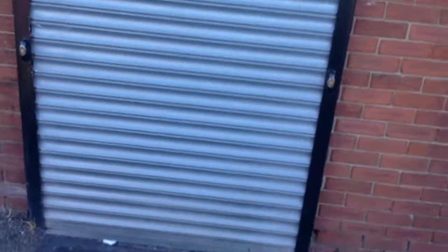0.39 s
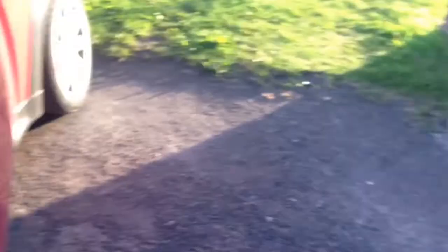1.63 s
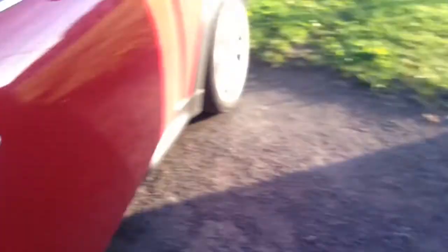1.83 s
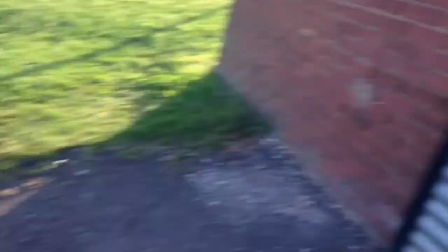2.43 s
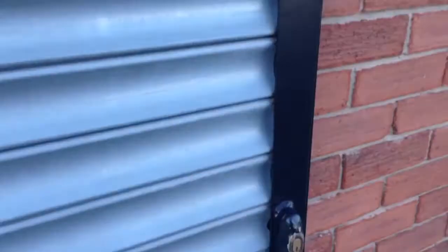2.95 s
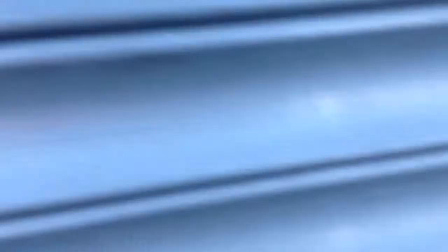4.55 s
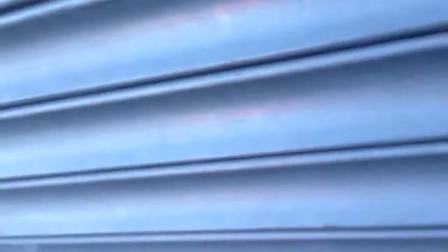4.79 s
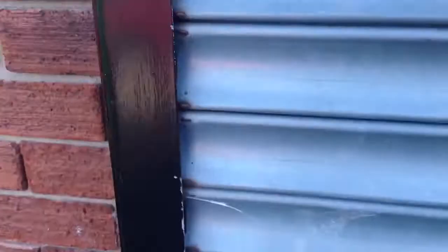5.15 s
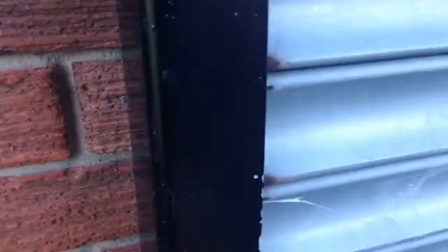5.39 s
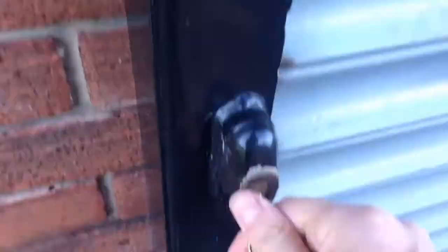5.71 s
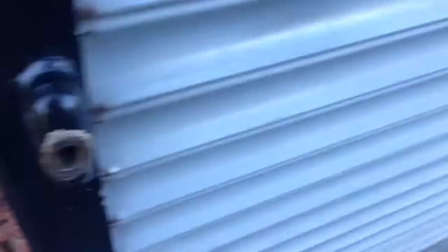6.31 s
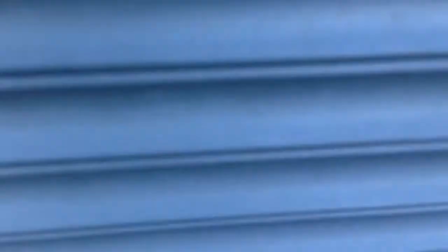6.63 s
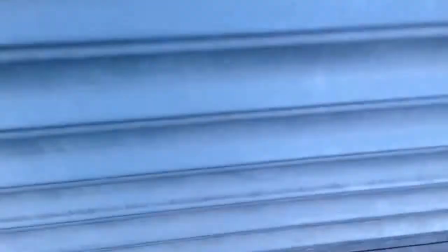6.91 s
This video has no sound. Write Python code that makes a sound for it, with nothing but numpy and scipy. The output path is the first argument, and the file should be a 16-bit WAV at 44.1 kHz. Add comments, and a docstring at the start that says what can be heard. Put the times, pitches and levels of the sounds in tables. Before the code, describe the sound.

Footsteps scuff, keys jingle and click in a lock as a vehicle passes, then a metal roller shutter clanks and starts rattling.

```python
"""Outside a brick building, shoes scuff over grit to a steel roller shutter and the microphone is bumped.
A bunch of keys jingles, each key ringing at its own pitches, and one cracks round in the key switch,
while a vehicle accelerates down the street with tyre hiss and a climbing exhaust note.
The shutter clanks as its drive takes up the slack, and the slats start to rattle upward."""
import sys
import numpy as np
from scipy import signal
from scipy.fft import rfft, irfft
from scipy.io import wavfile
from scipy.ndimage import map_coordinates

SR = 44100
rng = np.random.default_rng(int(sys.argv[2]) if len(sys.argv) > 2 else 0)


def dump(signal):
    """Clip the signal to [-1, 1] and save it as 16-bit WAV at the path in sys.argv[1]."""
    limited = np.clip(np.atleast_2d(signal).T, -1, 1)
    pcm = np.round(limited * 32767).astype(np.int16)
    wavfile.write(sys.argv[1], SR, pcm)


N = 311787
TIME = np.arange(N) / SR
BAND_EDGES_HZ = np.geomspace(22, 17000, 25)
BAND_HZ, BAND_WIDTH_HZ = np.sqrt(BAND_EDGES_HZ[1:] * BAND_EDGES_HZ[:-1]), np.diff(BAND_EDGES_HZ)
KEY_RANGE_HZ, CUTOFF_HZ = (6940, 14300), 15750

# bright tone of a key striking metal: freq_hz, level_db
KEY_EQ = [(600, -9), (1500, -4.5), (4200, -2.5), (7700, 1), (10000, -1), (16000, -0.5)]
# how hard the bunch swings, as the level of its tinkling: time_s, level_db
KEY_SWING = [(2.6, -69), (2.95, -56), (3.15, -66), (3.55, -53.5), (3.85, -56.5), (4.05, -48.5), (4.55, -47),
             (4.75, -55), (5.3, -53.5), (5.9, -68), (6.3, -44.5), (6.7, -56.5)]


def from_db(db):
    """Decibels to gain."""
    return 10 ** (np.asarray(db) / 20)


def unit_rms(x):
    """Scale to rms 1."""
    return x / np.sqrt(np.mean(x ** 2) + 1e-20)


def fader(points):
    """Gain from (time_s, level_db) points, silent outside their span."""
    times, db = np.transpose(points)
    return from_db(np.interp(TIME, times, db)) * (TIME > times[0]) * (TIME < times[-1])


def ramp(start_s, length_s):
    """Linear fade from 0 to 1."""
    return np.clip((TIME - start_s) / length_s, 0, 1)


def swell(peak_s, level_db, rise_s, fall_s):
    """Gain of a rounded swell, 29 dB down at rise_s before its peak and fall_s after."""
    gain = np.zeros(N)
    span = slice(*np.searchsorted(TIME, [peak_s - 3 * rise_s, peak_s + 3 * fall_s]))
    away = np.maximum((peak_s - TIME[span]) / rise_s, (TIME[span] - peak_s) / fall_s).clip(0)
    gain[span] = from_db(level_db - 29 * away ** 2.27)
    return gain


def drift(rate_hz):
    """Smooth random wander of rms about 1."""
    hop, warm_up = 40, 2000
    pole = np.exp(-2 * np.pi * hop * rate_hz / SR)
    white = rng.standard_normal(N // hop + warm_up + 2)
    slow = signal.lfilter([1], [1, -2 * pole, pole ** 2], white)[warm_up:]
    return np.interp(np.arange(N) / hop, np.arange(len(slow)), unit_rms(slow))


def eq_db(eq, hz):
    """Read an EQ curve on a log-frequency axis."""
    freqs, db = np.transpose(eq)
    return np.interp(np.log(hz), np.log(freqs), db)


def equalise(x, eq):
    """Minimum-phase EQ, falling 24 dB per octave past the curve's ends; rms 1."""
    size = 4096
    hz = np.arange(size // 2 + 1).clip(.5) * SR / size
    octaves_outside = np.maximum(np.log2(eq[0][0] / hz), np.log2(hz / eq[-1][0])).clip(0)
    cepstrum = irfft(np.log(from_db(eq_db(eq, hz) - 24 * octaves_outside)))
    cepstrum[1:size // 2] *= 2
    cepstrum[size // 2 + 1:] = 0
    impulse = irfft(np.exp(rfft(cepstrum)))
    return unit_rms(signal.fftconvolve(x, impulse)[:N])


def noise_bed(eq, flutter_db, rate_hz):
    """Shaped noise whose level wavers."""
    return equalise(rng.standard_normal(N), eq) * from_db(flutter_db * drift(rate_hz))


def noise_bands():
    """Narrow noise bands of rms 1; neighbours come from unrelated noise."""
    white = rng.standard_normal((2, N))
    bands = []
    for k in range(len(BAND_HZ)):
        bandpass = signal.butter(2, BAND_EDGES_HZ[k:k + 2], "band", fs=SR, output="sos")
        bands.append(unit_rms(signal.sosfilt(bandpass, white[k % 2])))
    return np.array(bands)


def grains(per_s, spread_db):
    """Tiny random contacts of uneven size."""
    sizes = from_db(spread_db * rng.exponential(1, N).clip(0, 3)) * rng.choice([-1, 1], N)
    return unit_rms(sizes * (rng.random(N) < per_s / SR)) + 1e-18


def pings(rows, t60_s):
    """Damped sines from rows of (start_s, level_db, pitch_hz)."""
    out, age = np.zeros(N + SR), np.arange(int(t60_s * SR)) / SR
    for start_s, db, hz in rows:
        at = int(start_s * SR)
        out[at:at + len(age)] += from_db(db - 60 * age / t60_s) * np.sin(2 * np.pi * hz * age)
    return out[:N]


def resonate(contacts, modes):
    """Each contact drives every mode with a strength of its own; rms 1."""
    out = 0
    for hz, width_hz, db in modes:
        r = np.exp(-np.pi * width_hz / SR)
        poles = [1, -2 * r * np.cos(2 * np.pi * hz / SR), r * r]
        drive = contacts * rng.standard_normal(N)
        out = out + from_db(db) * signal.lfilter([1 - r, 0, r - 1], poles, drive)
    return unit_rms(out)


def impacts(bands, hits, eq, t60_s, bass_hold, scatter_db, rattle_db,
            modes=(), modes_db=0, attack_s=0.00094):
    """Rattling noise bursts plus clear modes; t60_s holds at 2 kHz, and bass_hold lengthens the lows.
    A hit is start_s, level_db, then optionally tilt_db_per_octave, its own t60_s, ring_db."""
    out, t = np.zeros(N + SR), np.arange(SR // 2) / SR
    rattle = from_db(rattle_db * drift(104))   # tiny rebounds roughen the decay
    octaves = np.log2(BAND_HZ.clip(400) / 1000)
    defaults = [0, t60_s, 0]
    for start_s, db, *given in hits:
        tilt, decay_s, ring_db = given + defaults[len(given):]
        # every point of contact favours other bands
        band_db = eq_db(eq, BAND_HZ) + tilt * octaves + scatter_db * rng.standard_normal(len(BAND_HZ))
        gains = from_db(band_db) * np.sqrt(BAND_WIDTH_HZ)
        offset, size = rng.integers(N - SR), min(int(2 * decay_s * SR), len(t))
        burst = bands[:, offset:offset + size] * (gains / np.linalg.norm(gains))[:, None]
        band_t60_s = decay_s * (BAND_HZ[:, None] / 2000) ** -bass_hold
        envelope = from_db(-60 * t[:size] / band_t60_s) * (1 - np.exp(-t[:size] / attack_s))
        rough = rattle[offset:offset + size]
        rough = rough / np.sqrt(np.mean(rough[:size // 10] ** 2))
        at = int(start_s * SR)
        out[at:at + size] += from_db(db) * (burst * envelope).sum(0) * rough
        for hz, width_hz, mode_db in modes:
            age = t[:int(np.pi * SR / width_hz)]
            strength = from_db(db + modes_db + ring_db + mode_db + 2 * rng.standard_normal())
            strength *= rng.choice([-1, 1])
            pitch_hz = hz + width_hz / 2 * rng.standard_normal()
            ring = np.sin(2 * np.pi * pitch_hz * age) * np.exp(-np.pi * width_hz * age)
            out[at:at + len(age)] += strength * ring
    return out[:N]


def pass_by(closest_s, distance_m=8.05, speed_m_per_s=10.8):
    """Inverse-distance gain of the passing vehicle, 1 at its closest."""
    return distance_m / np.hypot(distance_m, speed_m_per_s * (TIME - closest_s))


def street():
    """Air rumble, far traffic and passing tyres; boomy and dull until just after the microphone bump."""
    # low rumble of outdoor air: freq_hz, level_db
    rumble_eq = [(25, -16), (65, -7), (175, 2), (300, -11.5), (500, -27.5)]
    # road roar: freq_hz, level_db
    roar_eq = [(90, -27.5), (220, -2), (380, 2), (700, -2.5), (1300, -10), (2400, -19.5)]
    # tyre hiss: freq_hz, level_db
    hiss_eq = [(1500, 1), (2800, 5), (4500, -2), (6500, 2.5), (8000, -8.5), (11000, -8), (16000, -14)]
    opens_s = 2.355
    dull = 1 - ramp(opens_s, 0.11)
    boom = from_db(-49) * (1 - ramp(opens_s, 0.0084))
    rumble_gain = boom + from_db(-66.5) * ramp(opens_s, 0.54)
    rumble = noise_bed(rumble_eq, flutter_db=3, rate_hz=10.4) * rumble_gain
    # steady far traffic plus the vehicle, whose tyres hiss most as it draws away
    road, tyres = pass_by(closest_s=4.92), pass_by(closest_s=5.72)
    roar_gain = np.hypot(from_db(-51), from_db(-41) * road) * from_db(-4 * dull)
    hiss_gain = np.hypot(from_db(-58.5), from_db(-51.5) * tyres) * from_db(-7 * dull)
    roar = noise_bed(roar_eq, flutter_db=2, rate_hz=29.5) * roar_gain
    hiss = noise_bed(hiss_eq, flutter_db=1.77, rate_hz=47) * hiss_gain
    lag_ms = 0.243 * (1 - tyres) + 0.21 * tyres
    ground_bounce = 0.6 * np.interp(TIME - lag_ms / 1000, TIME, hiss)
    return rumble + roar + hiss + ground_bounce


def exhaust(jitter=0.007, roughness=0.45):
    """The exhaust note climbs as the vehicle pulls away; uneven firing roughens it."""
    # the engine's firing rate: time_s, pitch_hz
    firing = [(4.85, 223), (5.02, 231.7), (5.27, 248.8), (5.7, 308.4), (6.0, 337.8)]
    # the note surges twice, then sinks into the road noise: time_s, level_db
    surges = [(4.82, -43), (4.92, -47), (5.01, -31.5), (5.11, -41), (5.28, -33), (5.7, -42.5), (6.0, -53)]
    pitch_hz = np.interp(TIME, *np.transpose(firing)) * (1 + jitter * drift(21.5))
    phase = 2 * np.pi * np.cumsum(pitch_hz) / SR
    overtone = swell(5.5, -41, rise_s=0.15, fall_s=1) * np.sin(2 * phase)
    return (fader(surges) * np.sin(phase) + overtone) * (1 + roughness * drift(60))


def footsteps(bands):
    """Shoes tap, crunch and drag on gritty paving."""
    # footfalls: start_s, level_db, tilt_db_per_octave
    steps = [(0.071, -36, 11), (0.188, -40.5, 10.5), (0.441, -30, 5), (0.52, -37.5, 9), (0.624, -33.5, 0.5),
             (1.407, -32.5, 4), (1.615, -29, 11), (1.696, -20, 4.5), (1.752, -28, 5.5), (1.883, -32.5, 2)]
    # a sole tapping the paving: freq_hz, level_db
    step_eq = [(88, -19), (150, 9), (361, 7.5), (745, 2), (923, -12.5), (1800, -9), (2500, -6),
               (4320, -31.5), (5050, -26), (7320, -49), (16000, -60)]
    # soles dragging: peak_s, level_db, rise_s, fall_s
    scuffs = [(0.56, -50.5, 0.13, 0.22), (0.864, -33, 0.086, 0.051), (0.985, -31, 0.13, 0.11),
              (1.34, -37.5, 0.13, 0.081), (1.66, -44.5, 0.15, 0.31)]
    # grit underfoot: freq_hz, level_db
    grit_eq = [(300, -8), (750, 1.5), (1600, 1.5), (2200, -2), (3500, -15), (16000, -33)]
    taps = impacts(bands, steps, step_eq, t60_s=0.063, bass_hold=0.068, scatter_db=1, rattle_db=8,
                   attack_s=0.00063)
    grit = equalise(grains(per_s=2000, spread_db=3), grit_eq)
    crunch = sum(swell(s + 0.003, db - 15, rise_s=0.013, fall_s=0.021) for s, db, _ in steps)
    drag = from_db(-6) * sum(swell(*scuff) for scuff in scuffs)
    return from_db(-4) * taps + grit * (crunch + drag)


def microphone_bump(bands):
    """A knock sets the microphone's case ringing."""
    # the knock and its uneven rebounds: start_s, level_db, tilt_db_per_octave
    knocks = [(2.155, -7, 1), (2.172, -9, 1.5), (2.194, -12.5, 0.5), (2.247, -24, -1.5),
              (2.297, -31.5, -4.5)]
    # bass-heavy body of the knock: freq_hz, level_db
    knock_eq = [(30, -9), (70, 4), (105, 4.5), (200, -1.5), (350, -2), (550, -4.5), (800, -10), (1200, -11),
                (2000, -15.5), (4000, -22), (9000, -33), (16000, -49)]
    # case resonances: pitch_hz, width_hz, level_db
    case_modes = [(72, 16, -1), (103, 22, 8), (186, 11.6, 9), (244, 14, -3), (322.5, 9.8, 7), (380, 7.1, 0),
                  (432, 14, 0)]
    return impacts(bands, knocks, knock_eq, t60_s=0.13, bass_hold=0.29, scatter_db=0.5, rattle_db=2.5,
                   modes=case_modes, modes_db=-18.5, attack_s=0.00056)


def handling_thuds(bands):
    """Handling gives the microphone soft, low thuds."""
    # thuds: start_s, level_db
    thuds = [(0.462, -13.5), (0.882, -16), (1.793, -12), (2.777, -11), (4.394, -25), (4.444, -23),
             (6.319, -20)]
    # their muffled tone: freq_hz, level_db
    thud_eq = [(25, -10), (70, 1), (150, -3.5), (300, -21), (800, -27), (3000, -57)]
    return from_db(-13.5) * impacts(bands, thuds, thud_eq, t60_s=0.054, bass_hold=0.023,
                                    scatter_db=2, rattle_db=0.5)


def dry_ticks(bands):
    """Small dry clicks, each with a very short ring."""
    # ticks: start_s, level_db, tilt_db_per_octave, ring_hz, ring_db
    ticks = [(0.442, -34.5, 8.5, 2430, -26), (0.926, -26, -6, 830, -21), (1.003, -33, -5, 1400, -21),
             (1.014, -27, -7, 1230, -17.5), (1.028, -29, -10, 940, -19), (1.752, -34, 3, 3300, -30),
             (2.614, -33, 1.5, 750, -42), (3.064, -38, 9, 4000, -32.5), (4.584, -25, 5, 1110, -23),
             (4.786, -20.5, 2.5, 2960, -23.5), (4.874, -26.5, -4.5, 3000, -17),
             (4.896, -36, 16, 2680, -27.5), (5.24, -17, 2.5, 3050, -19.5), (6.507, -14.5, 10, 3400, -15.5),
             (6.56, -19, -1, 1710, -11.5), (6.693, -20, -7, 950, -27)]
    # their midrange click: freq_hz, level_db
    tick_eq = [(60, -44), (250, -3), (500, 0), (1100, 4.5), (1900, -8), (3000, -2), (5000, -19),
               (9000, -20), (16000, -59)]
    clicks = impacts(bands, [tick[:3] for tick in ticks], tick_eq, t60_s=0.017, bass_hold=0.23,
                     scatter_db=3, rattle_db=3)
    return clicks + pings([(s, ring_db, hz) for s, _, _, hz, ring_db in ticks], t60_s=0.0068)


def rubbing():
    """The microphone's case is rubbed in small slips."""
    # rubs: peak_s, level_db, rise_s, fall_s
    rubs = [(4.655, -35, 0.17, 0.13), (6.575, -24.5, 0.12, 0.095)]
    # close, dull friction: freq_hz, level_db
    rub_eq = [(180, -9.5), (330, 2), (520, 1), (780, 2.5), (1100, -1), (1450, -6), (2400, -13.5),
              (3600, -23), (9000, -34.5)]
    return equalise(grains(per_s=900, spread_db=2.2), rub_eq) * sum(swell(*rub) for rub in rubs)


def rustle():
    """A dry rustle of fine grains while the key is held."""
    # thin, peaky treble: freq_hz, level_db
    rustle_eq = [(1400, -8), (3200, -8), (4600, 11), (5600, -8), (7000, 1.5), (9500, -26), (15000, -25)]
    texture = equalise(grains(per_s=6100, spread_db=4), rustle_eq)
    return texture * swell(5.7, -52, rise_s=0.95, fall_s=0.7)


def swish(peak_s=5.27, octaves_per_s=1.1):
    """A short scrape whose resonances slide upward."""
    # the scrape's tone at its loudest: freq_hz, level_db
    swish_eq = [(2000, -1.5), (3500, -6), (4700, 6), (6000, -7), (7400, -5.5), (8400, -9), (9700, -16),
                (14000, -20)]
    scrape = equalise(grains(per_s=4500, spread_db=6.5), swish_eq)
    speed = 2 ** (octaves_per_s * (TIME - peak_s).clip(-.5, .5))
    sweep = map_coordinates(scrape, [np.cumsum(speed)], order=3, mode="wrap")
    return sweep * swell(peak_s, -44, rise_s=0.3, fall_s=0.19)


def key_touches(count):
    """Light random touches that follow the swing of the bunch, as (start_s, level_db, pitch_hz)."""
    times, swing_db = np.transpose(KEY_SWING)
    starts = times[0] + (times[-1] - times[0]) * (np.arange(count) + rng.random(count)) / count
    levels = np.interp(starts, times, swing_db) + rng.uniform(-3.45, 6, count)
    return list(zip(starts, levels, rng.uniform(*KEY_RANGE_HZ, count)))


def key_sizzle(count, spread_db=4):
    """Metal sliding on metal: a spray of tiny contacts, each ringing at its own pitch; rms 1."""
    hz = rng.uniform(1500, CUTOFF_HZ, count)
    db = eq_db(KEY_EQ, hz) + spread_db * rng.standard_normal(count)
    return unit_rms(pings(zip(rng.uniform(0, N / SR, count), db, hz), t60_s=0.005))


def keys(bands):
    """Keys clash, tinkle and scrape along each other as the bunch swings."""
    # key striking key: start_s, clash_db, ring_hz, ring_db
    jingles = [(2.7374, -26, 7370, -30), (2.7592, -19, 14100, -36), (2.775, -10, 8270, -21),
               (2.804, -18, 8400, -32), (2.863, -31, 13300, -29), (2.87, -16, 11300, -32),
               (2.892, -21, 9300, -31), (2.904, -44, 8560, -28), (3.03, -29.5, 12000, -51),
               (3.3984, -24.5, 9200, -48), (3.439, -19, 9800, -31), (3.4487, -13.5, 9550, -22.5),
               (3.5445, -24, 11100, -30), (3.5645, -19, 13100, -21), (3.571, -17, 9200, -26),
               (3.768, -27, 13700, -30), (3.78, -22.5, 8950, -33), (3.955, -24, 13100, -31),
               (4.0126, -23.5, 8900, -33), (4.078, -20.5, 7950, -23.5), (4.2892, -23, 7650, -25.5),
               (4.301, -16.5, 12700, -34), (4.511, -24, 9320, -33), (4.54, -21, 9200, -24),
               (4.609, -16.5, 9300, -33), (4.673, -26, 9900, -37), (4.786, -29, 9140, -29),
               (4.875, -24, 9200, -26), (5.0947, -26, 12700, -34), (5.4914, -24.5, 7950, -40),
               (5.6472, -22, 9240, -41), (6.317, -20, 11000, -16.5), (6.442, -17, 11000, -31),
               (6.559, -28, 9800, -25.5)]
    # the key sliding into the lock: peak_s, level_db, rise_s, fall_s
    slides = [(2.797, -41, 0.037, 0.036), (2.878, -44, 0.021, 0.042), (3.57, -43, 0.04, 0.075)]
    clashes = impacts(bands, [jingle[:2] for jingle in jingles], KEY_EQ, t60_s=0.03, bass_hold=0.31,
                      scatter_db=2.5, rattle_db=5, attack_s=0.0012)
    main_modes = [(s, ring_db, hz) for s, _, hz, ring_db in jingles] + key_touches(count=300)
    side_modes = [(s, db - 6.5, hz) for s, db, _ in main_modes for hz in rng.uniform(*KEY_RANGE_HZ, 4)]
    rings = pings(main_modes + side_modes, t60_s=0.021)
    crisp_ticks = pings(key_touches(count=130), t60_s=0.0032)
    scraping = sum(swell(s, db - 25.5, rise_s=0.013, fall_s=0.021) for s, db, _, _ in jingles)
    sliding = sum(swell(*slide) for slide in slides)
    sizzle = key_sizzle(count=14000) * (scraping + sliding + from_db(-0.5) * fader(KEY_SWING))
    return from_db(-7) * clashes + from_db(-1.5) * rings + from_db(15.5) * crisp_ticks + sizzle


def key_switch(bands):
    """The key snaps past the pins with a short bright crack, and the housing rings on."""
    # the key seating and turning: start_s, level_db, tilt_db_per_octave, t60_s, ring_db
    snaps = [(4.094, -20, 3, 0.22, -5), (4.245, -23.5, 2, 0.2, -1), (4.316, -28.5, 3, 0.21, -10),
             (4.4, -18.5, 4, 0.21, 5), (4.444, -22.5, 8, 0.058, -15), (6.092, -23, 0, 0.22, -10)]
    # tone of the lock housing: freq_hz, level_db
    housing_eq = [(300, -30), (1000, -1), (3000, -2.5), (5000, -0.5), (8000, -0.5), (16000, -11.5)]
    # housing resonances: pitch_hz, width_hz, level_db
    housing_modes = [(4350, 7.5, -14), (4953, 11, 3), (6062, 19, -17), (7537, 13, -7), (8070, 13, -11),
                     (9300, 23, -13), (12500, 40, 6)]
    cracks = impacts(bands, [snap[:3] for snap in snaps], KEY_EQ, t60_s=0.03, bass_hold=0,
                     scatter_db=-1, rattle_db=1)
    housing = impacts(bands, snaps, housing_eq, t60_s=None, bass_hold=0.43, scatter_db=6.5, rattle_db=1,
                      modes=housing_modes, modes_db=-11)
    return cracks + from_db(-0.5) * housing


def shutter(bands, creep_s=6.856, run_s=7.01):
    """The slats jolt, slap and settle, then knock against each other and scrape up the guides."""
    # the curtain jolting: start_s, level_db, tilt_db_per_octave, t60_s, slap_db, settle_after_s
    jolts = [(6.261, -16.5, 1, 0.47, -14.5, .061), (6.786, -14.5, 0, 0.12, -12, 0.045)]
    # broad steel clank: freq_hz, level_db
    clank_eq = [(100, -30), (250, -4.5), (620, -1.5), (1000, -4.5), (1500, 0), (3000, -5), (6000, -1.5),
                (9000, -2.5), (16000, -7)]
    # slat resonances: pitch_hz, width_hz, level_db
    slat_modes = [(618, 51, -6), (926, 72, -1), (1440, 17, 6.5), (1623, 28, -1), (1760, 36, -6.5),
                  (2083, 40, -3), (2410, 27, -3), (2910, 29, -16), (3710, 23, -8.5)]
    # body of the rattling curtain: freq_hz, level_db
    body_eq = [(120, -20), (240, -2.5), (450, -6), (630, 6), (1200, -1.5), (2300, 1.5), (3200, -6.5)]
    # bright chatter in the guides: freq_hz, level_db
    chatter_eq = [(1500, -28), (2500, 0.5), (6000, 6), (9000, 3), (16000, -13)]
    hits = []
    for start_s, db, tilt, t60_s, slap_db, settle_after_s in jolts:
        jolt = (start_s, db, tilt, t60_s)
        slap = (start_s + 0.0082, slap_db, 1.5, 0.14)   # the slack closes
        settle = (start_s + settle_after_s, db - 7.5, -0.5, t60_s)   # the curtain drops back
        hits += [jolt, slap, settle]
    clanks = impacts(bands, hits, clank_eq, t60_s=None, bass_hold=0.35, scatter_db=4.5, rattle_db=2.5,
                     modes=slat_modes, modes_db=-46, attack_s=0.00035)
    knocks = grains(per_s=700, spread_db=1.5)
    body = from_db(-3) * resonate(knocks, slat_modes) + from_db(-8) * equalise(knocks, body_eq)
    chatter = equalise(grains(per_s=15000, spread_db=-1.5), chatter_eq) * from_db(2 * drift(65))
    # the loose slats shiver from the first jolt on
    shiver = (body * from_db(-49) + chatter * from_db(-52)) * (TIME > jolts[0][0])
    # the body grows as soon as the curtain creeps, the chatter only once it runs
    creeping_s, running_s = (TIME - creep_s).clip(0), (TIME - run_s).clip(0)
    body_db = -29.5 + 44 * creeping_s + 78 * running_s
    chatter_db = -33.5 + 254 * running_s
    rising = body * from_db(body_db) + chatter * from_db(chatter_db)
    return clanks + np.where(TIME > creep_s, rising, shiver)


def scene():
    """Mono mix: action at the shutter with a faint echo off the brickwork, close noises and the street."""
    bands = noise_bands()
    action = footsteps(bands) + keys(bands) + key_switch(bands) + shutter(bands)
    wall_echo = from_db(-16) * np.interp(TIME - 0.011, TIME, action, left=0)
    close = microphone_bump(bands) + handling_thuds(bands) + dry_ticks(bands)
    close += rubbing() + rustle() + swish()
    return (action + wall_echo + close + street() + exhaust())[None]


def record(dry):
    """Peaks clip at full scale and a steep low-pass cuts the top."""
    lowpass = signal.ellip(10, .1, 80, CUTOFF_HZ, fs=SR, output="sos")
    return signal.sosfilt(lowpass, np.clip(dry, -1, 1))


dry = scene()
out = record(dry)
dump(out)
```